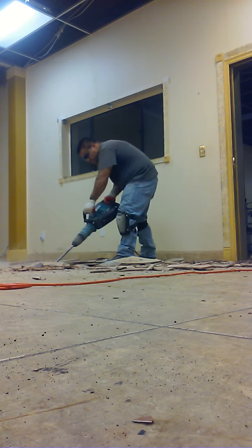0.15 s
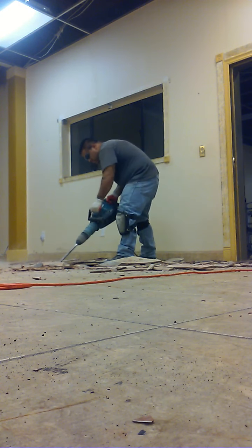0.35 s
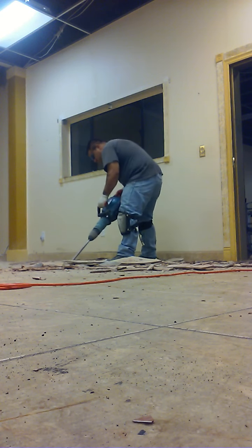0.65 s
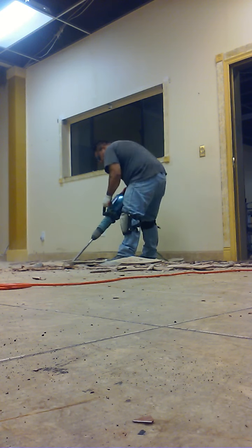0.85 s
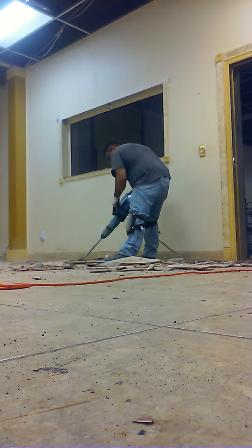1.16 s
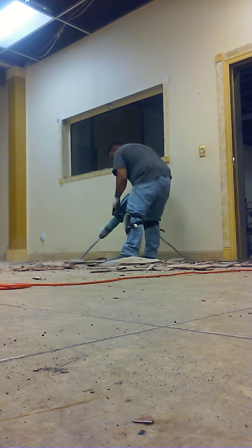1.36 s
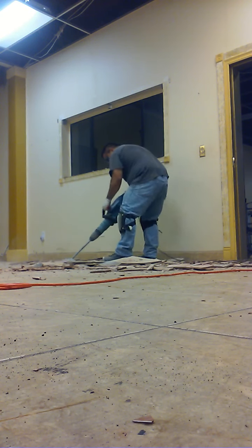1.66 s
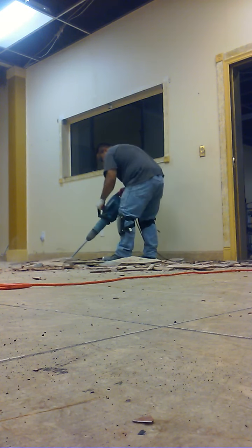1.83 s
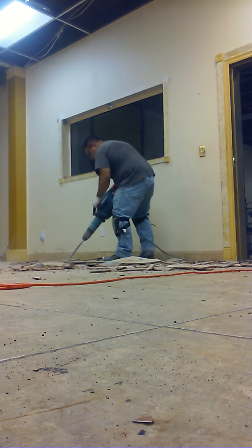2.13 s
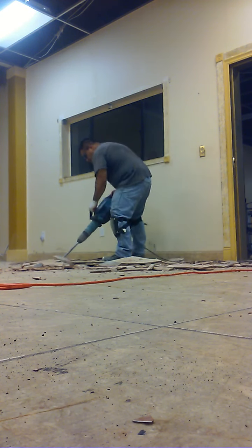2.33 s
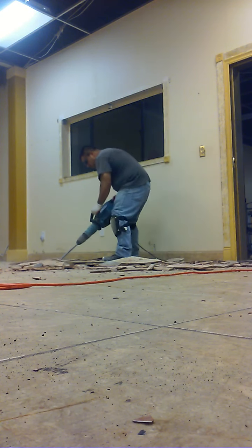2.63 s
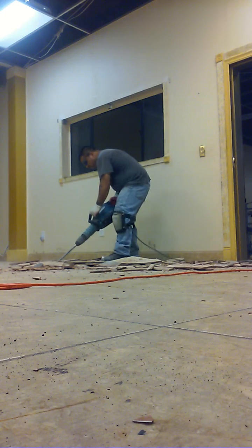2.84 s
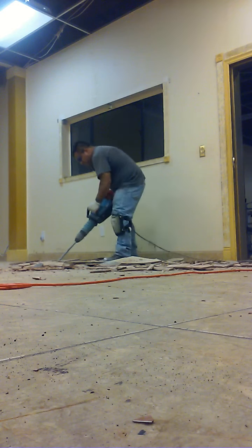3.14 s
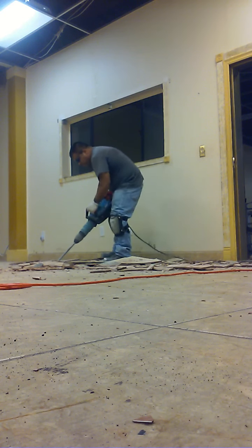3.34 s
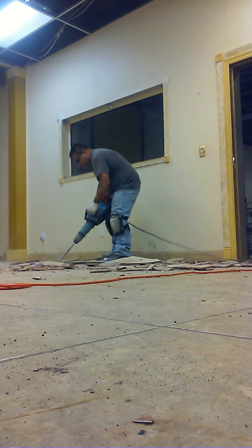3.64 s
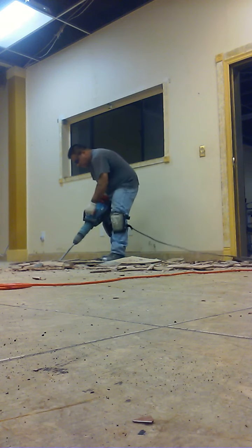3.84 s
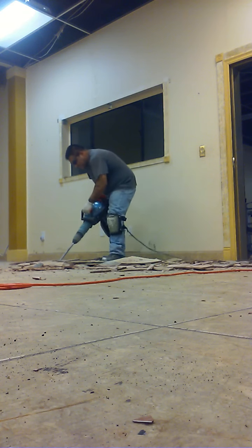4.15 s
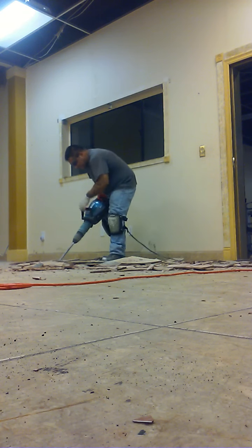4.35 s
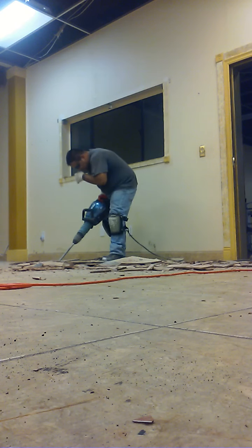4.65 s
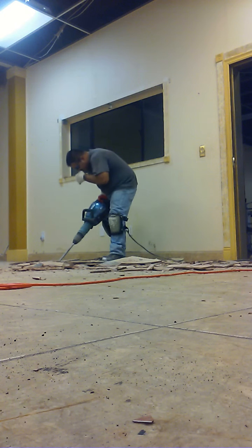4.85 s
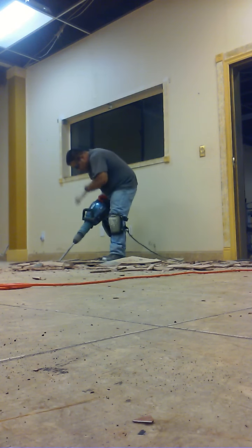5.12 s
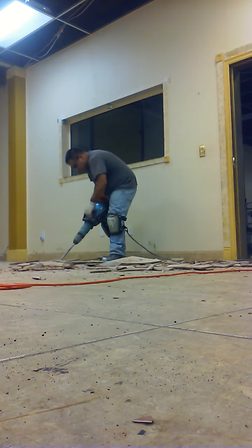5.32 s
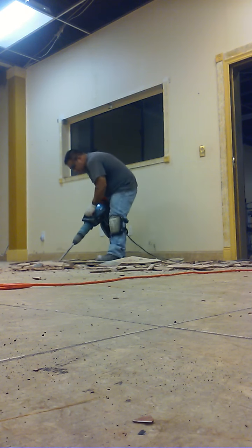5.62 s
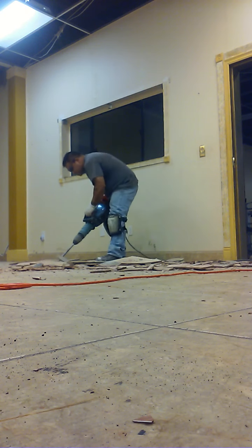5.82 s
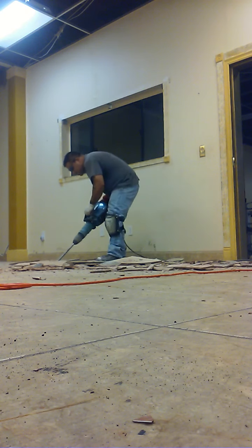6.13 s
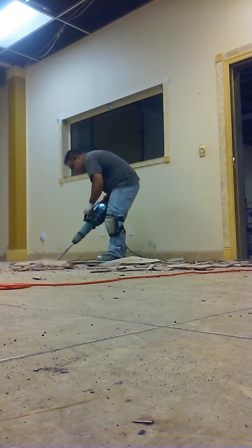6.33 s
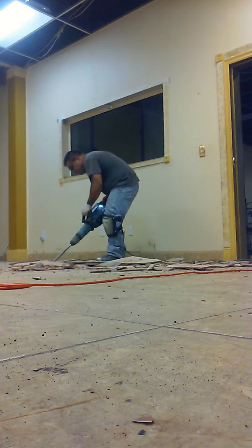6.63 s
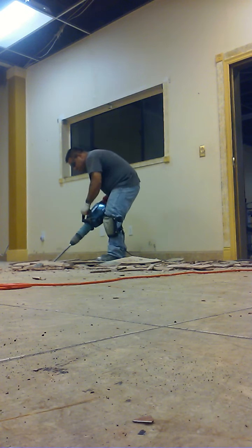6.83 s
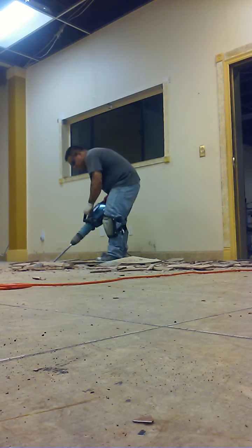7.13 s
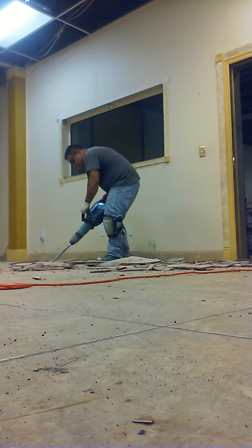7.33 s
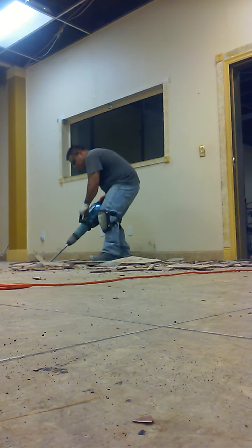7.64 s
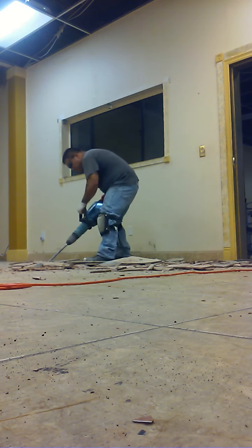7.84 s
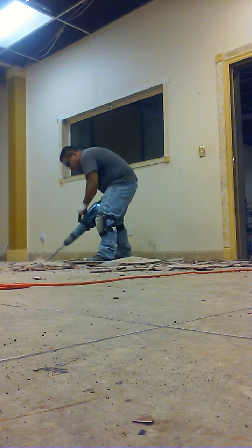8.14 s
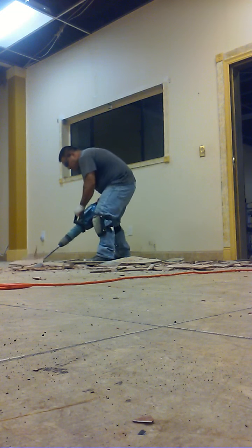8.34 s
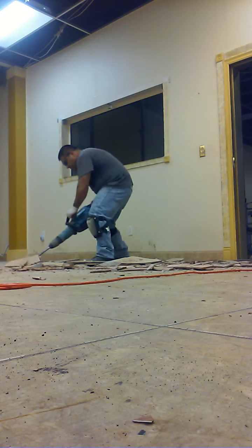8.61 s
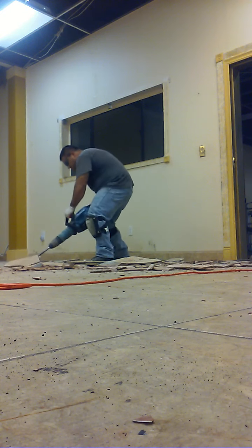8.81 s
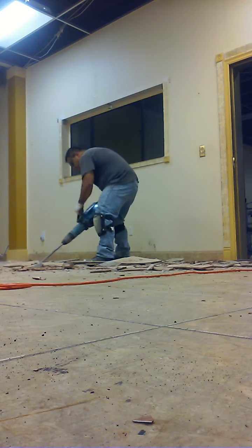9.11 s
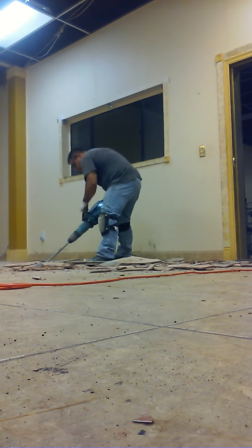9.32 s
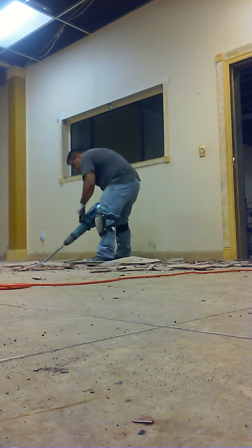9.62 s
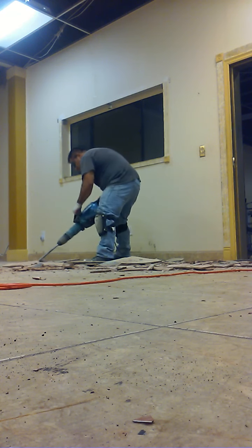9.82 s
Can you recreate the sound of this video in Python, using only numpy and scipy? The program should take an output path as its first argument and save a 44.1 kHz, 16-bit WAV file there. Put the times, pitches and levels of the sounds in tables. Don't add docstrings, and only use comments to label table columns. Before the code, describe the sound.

Rapid metallic hammering, nearly thirty blows a second, blurs in a reverberant hall. It breaks off early, leaving motor whirr, a faint slab fall and hollow scrapes, then resumes in short and long bouts. Tile crunches, shards ring, the floor thuds low. The small microphone distorts throughout the loud parts. The last burst stops, the motor slows and a slab drops loudly.

```python
import sys
import numpy as np
from scipy import signal
from scipy.fft import rfft, irfft, next_fast_len
from scipy.io import wavfile
from scipy.ndimage import uniform_filter1d, minimum_filter1d

SR = 44100
rng = np.random.default_rng(int(sys.argv[2]) if len(sys.argv) > 2 else 0)


def volts_from_db(level):
    exponent = np.asarray(level, float) / 20
    return 10 ** exponent


def to_wav(s):
    ch = np.atleast_2d(s).T
    pcm = np.round(np.clip(ch, -1, 1) * 32767)
    wavfile.write(sys.argv[1], SR, pcm.astype(np.int16))


N = 439677
STEP = 64

# (start [s], length [s], force over the gain control's top [dB],
# chisel ring [dB], shank ring relative to chisel [dB])
BOUTS = [(-.3, 0.76, 16.5, -2, -6.5), (1.84, 0.018, 4, -12, -3), (1.911, 0.15, 16, -5, -11.5),
         (2.329, .55, 14, -5, -5.5), (3.07, .13, 17, -1, -6), (3.388, 0.15, 12.5, -7.5, 0),
         (3.556, 0.27, 14, -5.5, -6), (3.86, .84, 16, -5, -8), (4.714, 1.96, 14.5, -7, -7.5),
         (6.75, 0.88, 17, -9.5, -6.5), (7.862, .18, 17.5, -10.5, -5), (8.034, .5, 19.5, -12.5, -2),
         (8.54, .23, 17, -11, -3), (8.914, 0.12, 11.5, -9, -7.5)]
# (frequency [Hz], width [Hz], level [dB])
CHISEL_MODES = [(4711, 133, -9), (4872, 214, -1.5), (5033.5, 177, 2), (5236, 225, -3.5), (5483, 320, -9),
                (5117, 590, -6.5)]
# (frequency [Hz], width [Hz], level [dB])
SHANK_MODES = [(6272, 238, 1.5), (6564, 400, -3.5), (7806, 116, -8), (8224, 440, -8.5), (10330, 130, -18.5)]
# (time [s], centre frequency [Hz])
RING_BEND = [(0.0, 4936), (1.7, 5020), (2.04, 4938), (3.85, 5018), (6.67, 4970), (8.11, 4910), (9.4, 4926)]
# (time [s], length [s], level [dB])
CRACKS = [(.25, .05, -11.5), (.7, .2, -24), (1.19, .05, -26), (1.25, 0.27, -16.5), (1.88, 0.32, -17),
          (2.2, .1, -16), (2.97, .03, -24), (3.93, .03, -36), (4.25, 0.29, -16), (4.53, .22, -18.5),
          (5.35, 0.44, -20), (6.7, .06, -17.5), (7.37, 0.15, -14), (7.8, 0.046, -15), (8.85, 0.036, -19),
          (9.16, 0.061, -14.5), (9.44, 0.087, -41)]
# (frequency [Hz], level per Hz [dB])
CRUNCH_COLOUR = [(60, -12.5), (300, -12.5), (1000, -2.5), (2000, -2), (3400, 3.5), (4500, -7), (7000, 0.5),
                 (9000, -11.5), (14000, -26)]
# (time [s], length [s], frequency
# [Hz], width [Hz], level [dB])
SINGING_BANDS = [(.42, 0.4132, 3200, 290, -20), (0.852, 0.49, 80, 16, -41), (1.252, 0.092, 830, 220, -15),
                 (1.496, 0.43, 818, 62, -25.5), (2.1, 0.3, 3400, 400, -26), (2.75, 0.73, 3400, 340, -24),
                 (6.74, 0.14, 3470, 350, -22), (7.4, .2, 4000, 1200, -20), (0.424, 0.31, 5000, 110, -9),
                 (1.3, .25, 1490, 60, -21), (9.54, .36, 940, 90, -26), (7.82, 0.79, 544, 155, -25.5),
                 (9.432, 0.16, 284, 160, -28.5), (9.439, 0.16, 2970, 170, -25)]
# (time [s], boom level [dB])
BITE = [(0.0, -30.5), (0.47, -27.5), (0.53, -34), (1.83, -44), (1.97, -25), (2.25, -53), (2.58, -25),
        (3.33, -34), (3.41, -32), (6.52, -27), (6.58, -31.5), (7.53, -25), (7.77, -29), (8.33, -27.5),
        (9.19, -40.5), (9.47, -51), (9.69, -44), (9.97, -48)]
# (time [s], length [s], level [dB])
THUMPS = [(.12, .33, -39), (3.6, 0.15, -35), (3.86, 0.046, -25), (4.2, 0.37, -31.5), (5.0, 0.33, -38),
          (5.6, .08, -26), (5.95, 0.53, -33.5), (7.5, 0.073, -25), (7.87, .05, -30), (8.17, .04, -24),
          (8.27, .06, -27), (8.45, .05, -32), (8.63, .05, -27)]
# (frequency [Hz], level per Hz [dB])
BOOM_COLOUR = [(12, -40), (20, -10), (38, -4), (103, -4), (167, -1), (303, -5), (600, -4.5), (780, -38),
               (1320, -120)]
# (time [s], length [s], level [dB],
# centre of the hollow ring [Hz], higher modes relative to it [dB])
SLABS = [(1.245, .2, -8, 903, -1), (1.5, .28, -25, 840, -6), (1.785, .07, -17, 860, -4),
         (1.857, 0.038, -12, 865, -3.5), (1.982, 0.26, -20, 855, 1.5), (2.183, 0.11, -16, 840, -5),
         (4.74, 0.27, -16, 900, -7), (5.124, 0.049, -13.5, 860, -6), (5.25, .35, -16.5, 854, -6),
         (5.415, .05, -11.5, 795, -6), (5.55, 0.058, -12, 800, 1), (6.16, .07, -19, 760, 3),
         (6.4, 0.036, -18, 735, 4.5), (6.867, 0.033, -18.5, 647, 5), (7.13, 0.049, -22.5, 670, 3),
         (7.512, 0.061, -14.5, 710, -7), (7.67, 0.17, -19, 830, -5), (7.824, 0.049, -11, 650, -21),
         (7.974, 0.2, -16, 670, -10), (8.254, 0.04, -12.5, 655, -8), (8.426, 0.11, -15.5, 625, -26),
         (9.128, 0.033, -18.5, 690, -21), (9.25, 0.13, -30.5, 860, -4), (9.426, 0.11, -7.5, 935, -6.5)]
# (frequency [Hz], width [Hz], level [dB])
SLAB_MODES = [(1103, 22, -6), (1419, 69, -0.5), (1480, 36, -0.5), (1693, 100, 0), (1798, 77, -5),
              (2110, 20, -18), (2303, 130, -2), (2805, 90, -2.5), (3620, 51, -9)]
# (time [s], length [s], level [dB])
SCRAPES = [
    (8.27, 0.27, -25.5),
    (8.67, .06, -23.5),
    (8.86, 0.12, -33),
    (9.24, .09, -26),
]
# (time [s], level [dB], pitch factor, t60 [s])
DROPS = [
    (1.258, -22, .87, 1.6),
    (9.433, -0.5, 1.005, 1.15),
]
# (frequency [Hz], level [dB])
DROP_MODES = [(290, -13), (480, -14), (630, -2), (760, -24), (890, 8), (930, 10.5), (980, 7), (1075, -13),
              (1420, -16), (1600, -1.5), (2330, -26), (2900, -18), (3680, -22)]
# (time [s], length [s], fizz level [dB])
SCUFFS = [
    (1.26, 0.066, -51),
    (1.72, .05, -45),
    (9.55, .1, -53),
    (9.68, 0.049, -49),
]
# (frequency [Hz], level per Hz [dB])
FAN_COLOUR = [(94, -57), (160, -36), (226, -19.5), (462, -6.5), (508, -7), (1190, -8.5), (1360, -25),
              (1470, -9.5), (2620, -11.5), (6110, -6.5), (16000, -84)]
# (frequency [Hz], level [dB])
WHINE = [(232, -40.5), (464, -38), (2085, -36), (4200, -38), (6270, -45)]
# (frequency [Hz], t60 [s])
HALL = [(100, 2.14), (1000, 1.68), (5000, 1.1), (10000, 1.32)]
# (frequency [Hz], level [dB])
MIC = [(5, -60), (30, -11.5), (80, -0.5), (300, 1), (3000, -0.5), (5000, -0.5), (9000, -3), (12000, -1.5),
       (15000, 0.5)]
# (frequency [Hz], level [dB])
EDGE = [(15800, 0), (15950, -80)]
# (frequency [Hz], level [dB])
QUIET_COLOUR = [(7000, 0), (9000, -1), (12000, -4), (14000, -9), (15500, -26)]
# (frequency [Hz], level [dB])
DULL_COLOUR = [(5500, -40), (7000, -6), (9000, -3), (12000, -2), (16000, -1)]
# (time [s], length [s], difference [dB])
SPLITS = [(0.209, 0.11, -12), (2.627, 0.038, -22), (2.833, 0.041, -13), (4.461, 0.035, -25),
          (4.528, 0.044, -9), (5.341, 0.038, -22), (5.599, 0.038, -18), (6.177, 0.041, -17),
          (6.249, 0.084, -24), (7.175, 0.041, -16), (8.037, 0.038, -20)]


def hammer():
    ring_db, shank_db, fizz_db = effort()
    near = np.clip((fizz_db + 44) / 14, 0, 1)
    field = hall(blows(), wet_db=5.5, near=near)
    steel = ringing_steel(field, ring_db, shank_db)
    cracks = hall(blows() + 0.37 * grains(per_s=120, spread_db=6.5), wet_db=0.5, near=near)
    cracks = cracks * volts_from_db(2.26 * slow(length=900))
    return steel + singing_bands(cracks) + crunch(cracks) + floor_boom(field)


def blows():
    blows_per_s = 28.4
    pace = blows_per_s * (1 + .06 * evened(uniform_filter1d(rng.standard_normal(N), 3000)))
    turns = np.cumsum(pace) / SR
    force = volts_from_db(2.5 * rng.standard_normal(400))[turns.astype(int)]
    chatter = np.exp(-(turns % 1) / 0.2) + 0.076
    return force * chatter * grains(per_s=6000, spread_db=3.)


def effort():
    ring_fall, first_blow_share = 63.5, 0.22
    power = volts_from_db(2 * envelopes(BOUTS, rise_s=0.15, fall_db_per_s=ring_fall))
    power += first_blow_share * volts_from_db(2 * envelopes(BOUTS, rise_s=.004, fall_db_per_s=ring_fall))
    force = 10 * np.log10(power.sum(0))
    ring, shank = np.transpose(BOUTS)[3:] @ power / power.sum(0)
    t = np.arange(0, N, STEP) / SR - DROPS[-1][0]
    duck = -21 * (t > 0) * np.exp(-np.maximum(t, 0) / 0.09)
    ring_db = ring + 1.8 * np.minimum(force, 0) + duck
    shank_db = uniform_filter1d(ring_db + shank + 3.5, size=20)
    idle_fizz_db = -73.5 + 12.0 + run_down()[::STEP] + duck
    scuffs = envelopes(SCUFFS, rise_s=0.016, fall_db_per_s=48)
    fizz_db = joined(-46.5 + 1.86 * force, idle_fizz_db, *scuffs)
    return full(joined(ring_db, -35.5 + duck)), full(joined(shank_db, -26 + duck)), full(fizz_db)


def ringing_steel(field, ring_db, shank_db):
    bend = columns(RING_BEND)[0] / 5000
    chisel = volts_from_db(ring_db + 0.8 * slow(length=2500)) * modes(field, CHISEL_MODES, bend)
    shank = volts_from_db(shank_db - 3. + 0.96 * slow(length=2000)) * modes(field, SHANK_MODES)
    return chisel + shank


def singing_bands(cracks):
    out = np.zeros(N)
    for s, length, hz, width, db in SINGING_BANDS:
        start = round(s * SR)
        ring = cracks[start:][:round(length * SR)]
        ring = resonate(resonate(ring, hz, width), hz, width)
        out[start:][:len(ring)] += volts_from_db(db) * evened(ring) * signal.windows.tukey(len(ring), .4)
    return out


def crunch(cracks):
    grind_db = -18.5 + 0.33 * (columns(BITE)[0] + 32)
    bursts = envelopes(CRACKS, rise_s=0.0098, fall_db_per_s=102)
    level_db = joined(grind_db, -29.5, full(joined(*bursts)))
    return volts_from_db(level_db - 3.) * evened(colour(cracks, CRUNCH_COLOUR))


def floor_boom(field):
    wander = volts_from_db(2.35 * slow(length=1200) + 2.5 * slow(length=3500))
    boom = colour(field, BOOM_COLOUR + [(900, -51)]) * wander
    return volts_from_db(boom_level() + 0.5) * evened(boom)


def boom_level():
    thumps = envelopes(THUMPS, rise_s=0.018, fall_db_per_s=122)
    return joined(columns(BITE)[0] - 1.5, full(joined(*thumps)))


def slabs():
    each = envelopes(SLABS, rise_s=0.033, fall_db_per_s=76)
    rubble_db = -28 + .5 * (columns(BITE)[0][::STEP] + 30)
    power = volts_from_db(2 * np.vstack([each, rubble_db]))
    rubble_hz, rubble_upper_db = 750, -3.5
    traits = np.c_[np.transpose(SLABS)[3:], [rubble_hz, rubble_upper_db]]
    hz, upper_db = map(full, traits @ power / power.sum(0))
    level_db = full(10 * np.log10(power.sum(0))) + 0.92 * slow(length=1200)
    knocks = hall(grains(per_s=500, spread_db=3.), wet_db=9.0)
    hollow = 0
    for ratio, width, db in [(0.961, 116, 5.5), (1.095, 240, 7.0), (0.904, 300, -3.0)]:
        hollow = hollow + volts_from_db(db) * resonate(resonate(knocks, hz * ratio, width), hz * ratio, width)
    hollow = hollow / smooth(hollow, length=6000)
    upper = volts_from_db(upper_db - 1.1) * modes(knocks, SLAB_MODES)
    scrape_db = full(joined(*envelopes(SCRAPES, rise_s=0.0091, fall_db_per_s=56)))
    thin = volts_from_db(scrape_db) * modes(knocks, [(1112, 50, 0)])
    return thin + volts_from_db(level_db - 4.5) * (hollow + upper)


def drop(s, db, pitch, t60):
    t = np.maximum(np.arange(N) / SR - s, 0)
    out = np.zeros(N)
    for hz, mode_db in DROP_MODES:
        fade_db = 60 * t / t60 * (1 + abs(np.log(hz / 930)))
        out += volts_from_db(mode_db - fade_db) * np.sin(2 * np.pi * hz * pitch * t)
    return volts_from_db(db - 14.0) * out


def motor():
    waver = 1 + .003 * slow(length=5000)
    lines = sum(volts_from_db(db - 1.5) * np.sin(2 * np.pi * hz * np.cumsum(waver) / SR) for hz, db in WHINE)
    fan = volts_from_db(-25) * evened(colour(rng.standard_normal(N), FAN_COLOUR))
    duck_db = -.3 * np.maximum(effort()[2] + 45, 0)
    return volts_from_db(duck_db) * (fan + volts_from_db(1.3 * run_down()) * lines)


def run_down():
    trigger_off_s, length_s, loss_db = 9.15, .12, -14
    return loss_db * np.clip((np.arange(N) / SR - trigger_off_s) / length_s, 0, 1)


def hall(x, wet_db, near=1):
    hz, t, z = signal.stft(rng.standard_normal((3, SR)), SR, nperseg=256)
    decay = volts_from_db(-60 * t / read(HALL, hz)[:, None])
    tails = signal.istft(z * decay, SR, nperseg=256)[1]
    early = np.r_[x[-SR:], x]
    turn = 2 * np.pi * (np.arange(len(early)) / SR * 1.9 + np.arange(3)[:, None] / 3)
    wet = signal.fftconvolve(early * np.cos(turn), tails, axes=1).sum(0)[SR:SR + N]
    return evened(near * evened(x) + volts_from_db(wet_db) * evened(wet))


def grains(per_s, spread_db):
    draw = rng.random((3, N))
    struck = draw[0] < per_s / SR
    return struck * np.sign(draw[1] - .5) * volts_from_db(-spread_db * np.log(draw[2] + 0.0072))


def modes(x, table, bend=1):
    body = 0
    for hz, width, db in table:
        ring = resonate(resonate(x, hz * bend, 1.65 * width), hz * bend, 1.65 * width)
        body = body + volts_from_db(db + 2. * slow(length=1500)) * evened(ring)
    return body / smooth(body, length=5000)


def resonate(x, hz, width):
    turn = np.exp(2j * np.pi * np.cumsum(hz * np.ones(len(x))) / SR)
    r = np.exp(-np.pi * width / SR)
    return 2 * (turn * signal.lfilter([1 - r], [1, -r], x / turn)).real


def colour(x, points, lag_turns=0.):
    size = next_fast_len(N + 4096)
    hz = np.fft.rfftfreq(size, 1 / SR)
    lag = np.exp(-2j * np.pi * lag_turns * (hz / 5000) ** 2)
    return irfft(rfft(x, size) * volts_from_db(read(points, hz)) * lag, size)[:N]


def read(points, hz):
    f, value = np.transpose(points)
    return np.interp(np.log(hz + 1), np.log(f + 1), value)


def envelopes(rows, rise_s, fall_db_per_s):
    s, length, db = np.transpose(rows)[:3, :, None]
    t = np.arange(0, N, STEP) / SR - s
    build = 10 * np.log10(1 - np.exp(-np.maximum(t, 0) / rise_s) + 1e-12)
    return db + build - fall_db_per_s * np.maximum(t - length, 0)


def joined(*db):
    return 10 * np.log10(sum(volts_from_db(2 * d) for d in db))


def columns(rows):
    s, *values = np.transpose(rows)
    return [np.interp(np.arange(N) / SR, s, v) for v in values]


def full(curve):
    return np.interp(np.arange(N), np.arange(0, N, STEP), curve)


def slow(length):
    return evened(uniform_filter1d(uniform_filter1d(rng.standard_normal(N), length), length))


def smooth(x, length):
    return np.sqrt(abs(uniform_filter1d(x ** 2, length)) + 1e-9)


def evened(x):
    return x / np.sqrt(np.mean(x ** 2) + 1e-20)


def scene():
    falls = sum(drop(*row) for row in DROPS)
    return np.tile(hammer() + slabs() + falls + motor(), (2, 1))


def band_limit(x):
    return signal.sosfilt(signal.butter(12, 16970, fs=SR, output="sos"), x)


def record(dry):
    level = smooth(dry[0], length=3000)
    fizz_db = effort()[2]
    depth = volts_from_db(0.8 * (fizz_db - 20 * np.log10(level)) + 21.5)
    knee = lambda x: x / (1 + abs(x) ** 2.565) ** (1 / 2.53)
    lean = 0.077 * volts_from_db(boom_level() + 30)
    mid = (knee(dry[0] / level * depth + lean) - knee(lean)) / knee(depth)
    mid = colour(mid, MIC + EDGE, lag_turns=.05)
    quiet = np.clip((-40 - fizz_db) / 8, 0, 1)
    mid = (1 - quiet) * mid + quiet * colour(mid, QUIET_COLOUR)
    treble_db = np.minimum(joined(run_down(), 2. * (fizz_db + 51)), 0)
    mid = mid - (1 - volts_from_db(treble_db)) * colour(mid, DULL_COLOUR)
    mid = mid * np.minimum(level, volts_from_db(-6.0)) / smooth(mid, length=3000)
    crest = -minimum_filter1d(-abs(mid), size=301)
    mid = mid / uniform_filter1d(np.maximum(crest, 1), size=151)
    t, share = np.arange(N) / SR, np.zeros(N)
    for s, length, db in SPLITS:
        end = s + min(length, .05)
        share += volts_from_db(db + 6) * np.clip(np.minimum(t - s, end - t) / .012, 0, 1)
    share = np.clip(share, 0, .95)
    side = share * colour(np.roll(mid, 900), [(2500, -22), (4000, 0)])
    mid = mid * np.sqrt(1 - share ** 2)
    return band_limit(np.array([mid + side, mid - side]))


dry = scene()
out = record(dry)
to_wav(out)
```